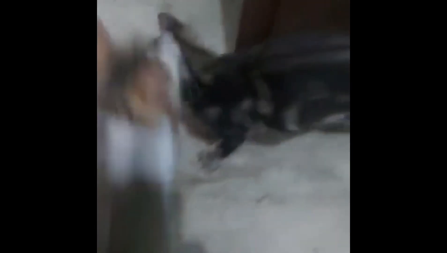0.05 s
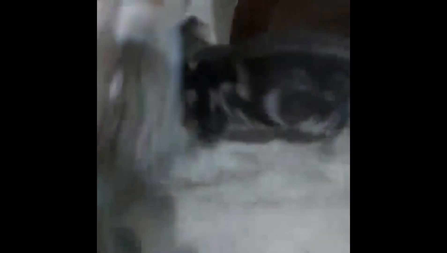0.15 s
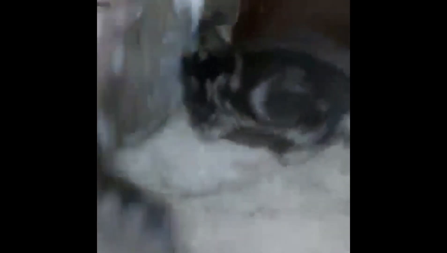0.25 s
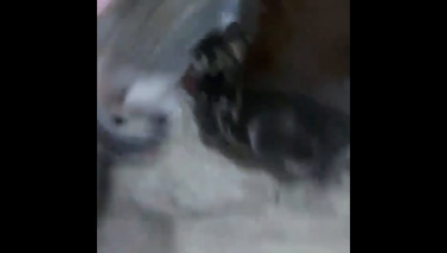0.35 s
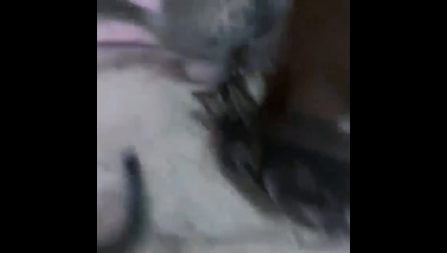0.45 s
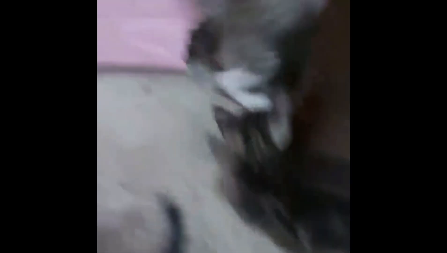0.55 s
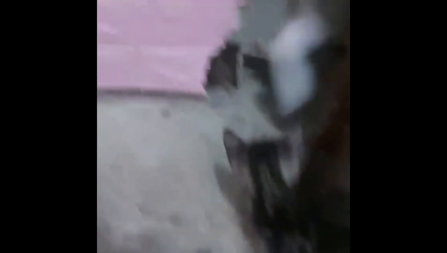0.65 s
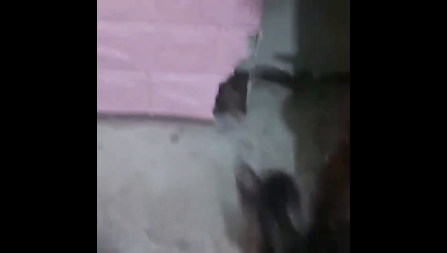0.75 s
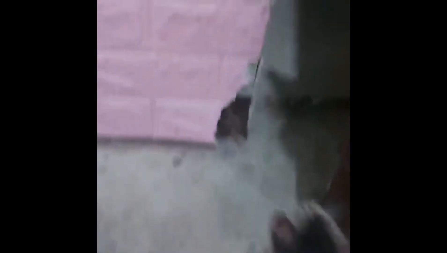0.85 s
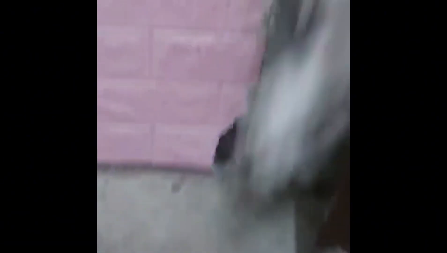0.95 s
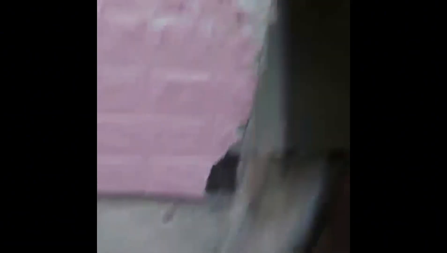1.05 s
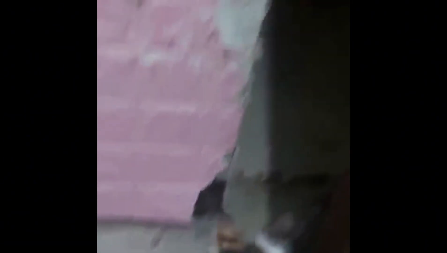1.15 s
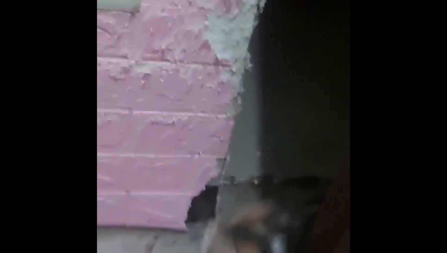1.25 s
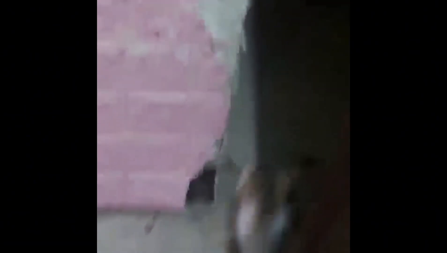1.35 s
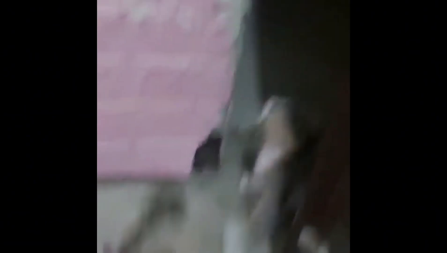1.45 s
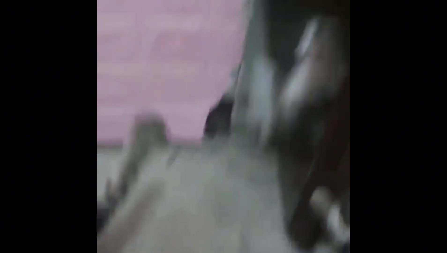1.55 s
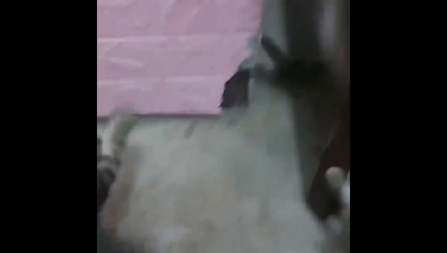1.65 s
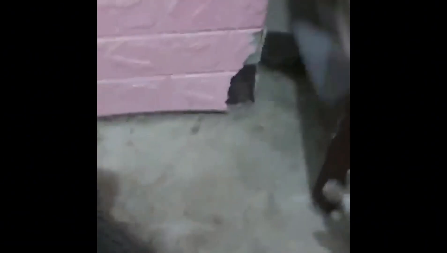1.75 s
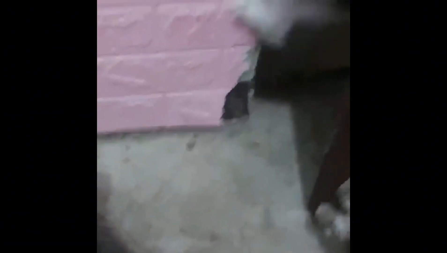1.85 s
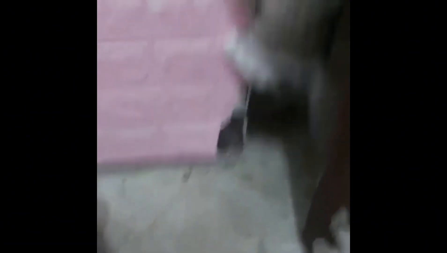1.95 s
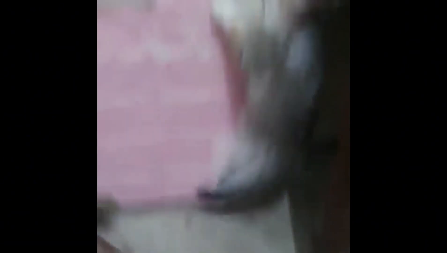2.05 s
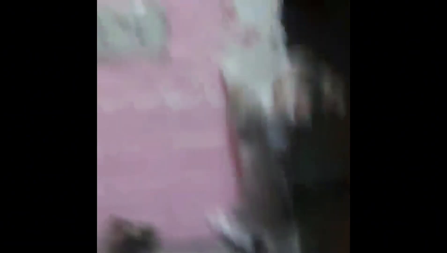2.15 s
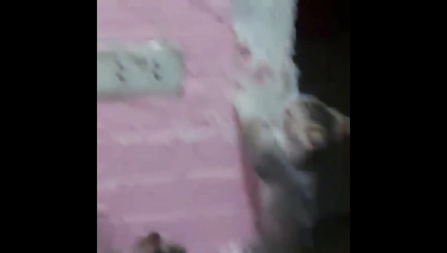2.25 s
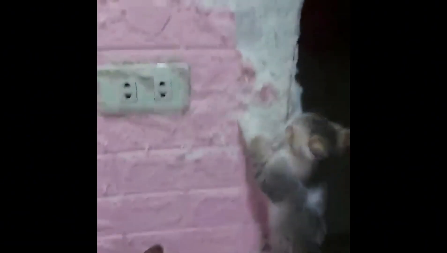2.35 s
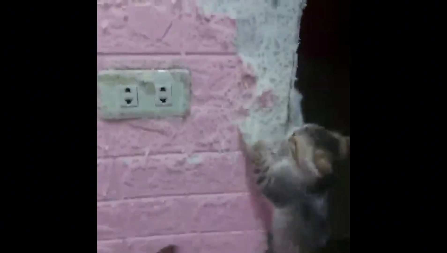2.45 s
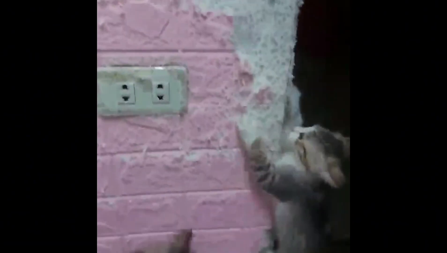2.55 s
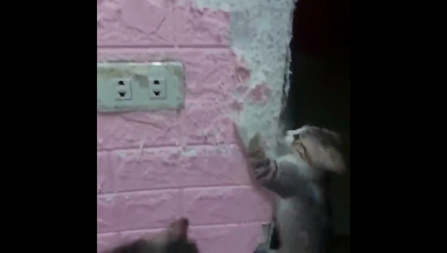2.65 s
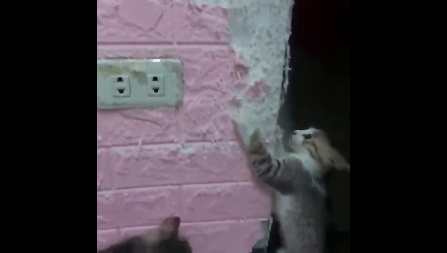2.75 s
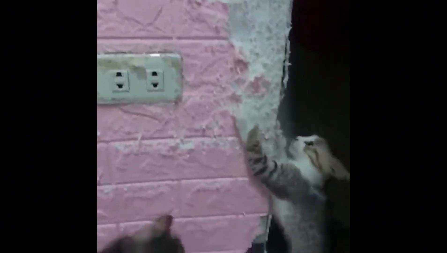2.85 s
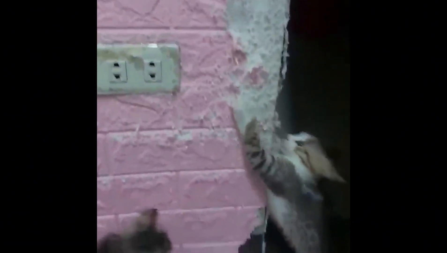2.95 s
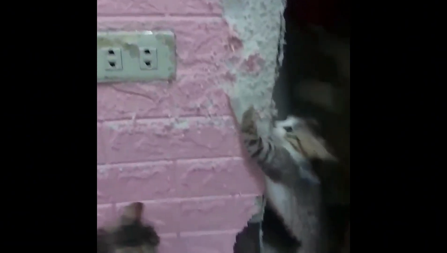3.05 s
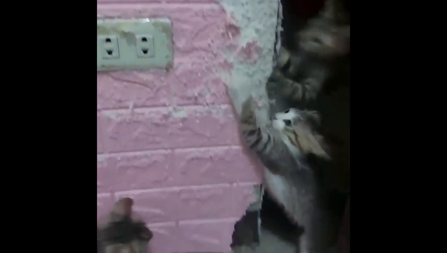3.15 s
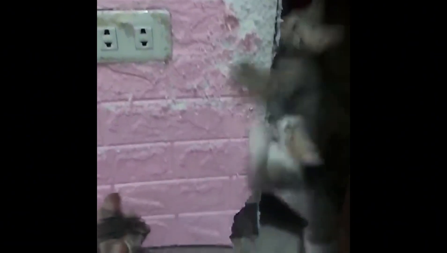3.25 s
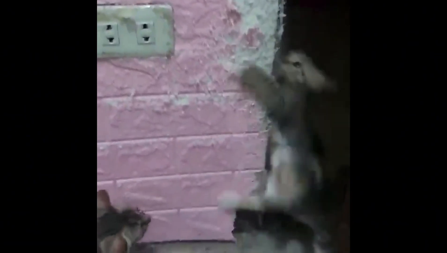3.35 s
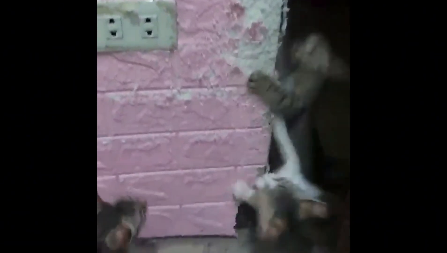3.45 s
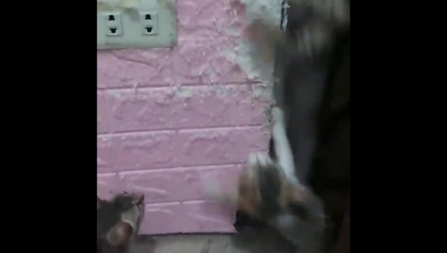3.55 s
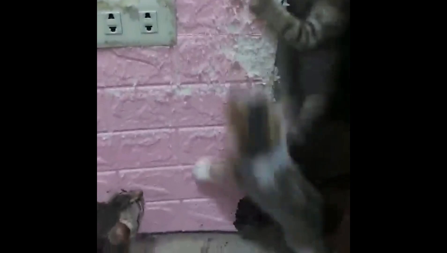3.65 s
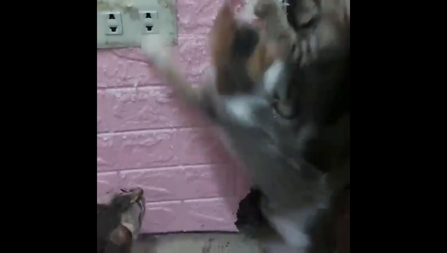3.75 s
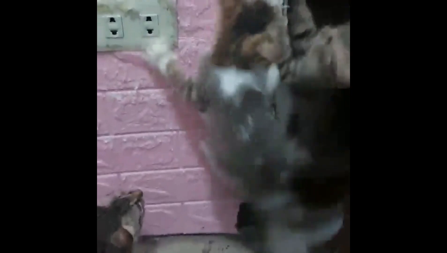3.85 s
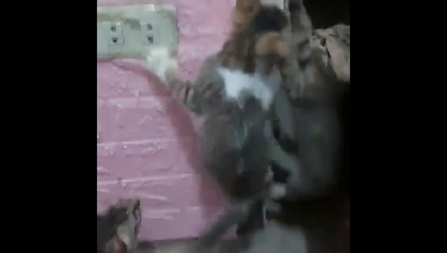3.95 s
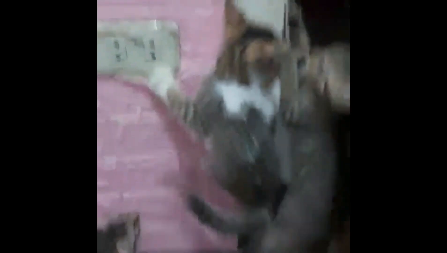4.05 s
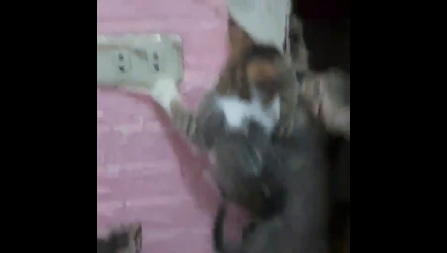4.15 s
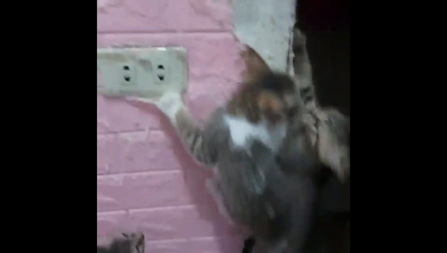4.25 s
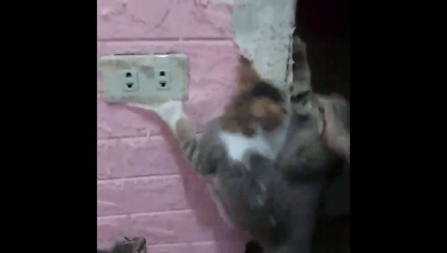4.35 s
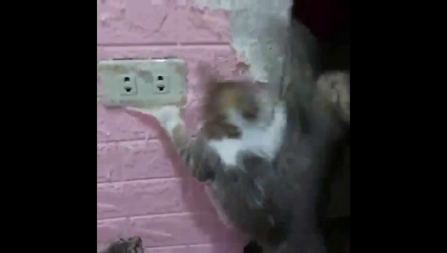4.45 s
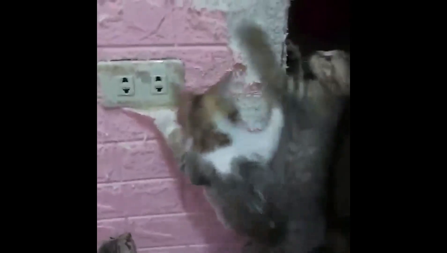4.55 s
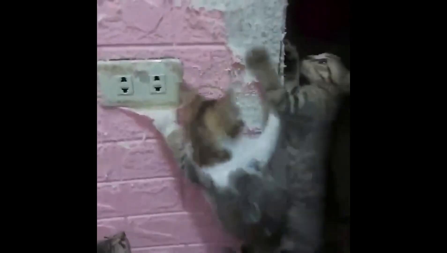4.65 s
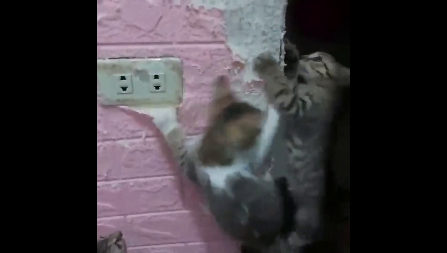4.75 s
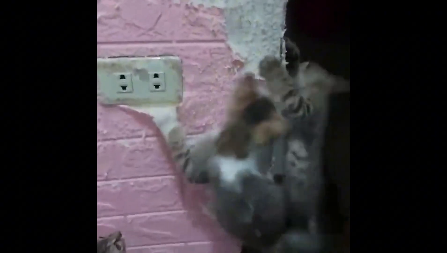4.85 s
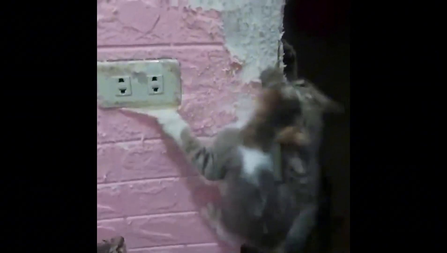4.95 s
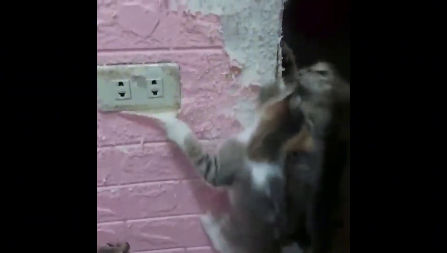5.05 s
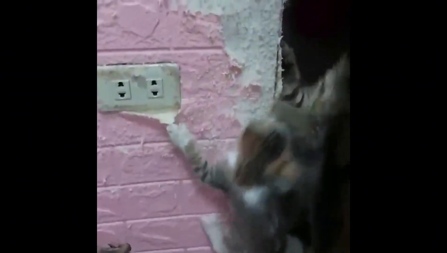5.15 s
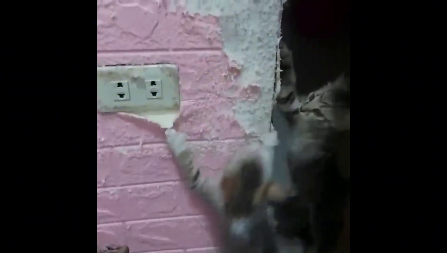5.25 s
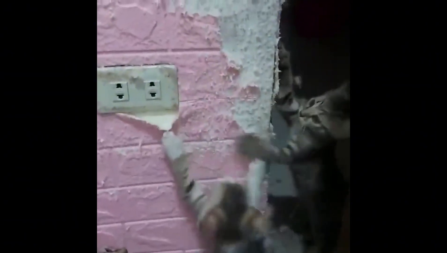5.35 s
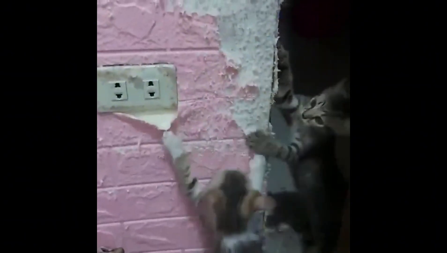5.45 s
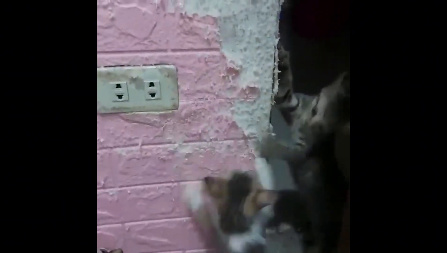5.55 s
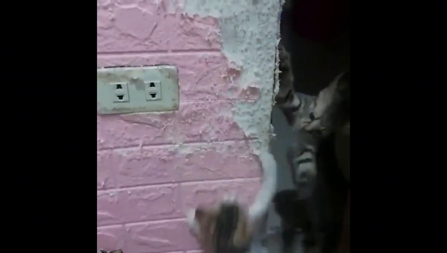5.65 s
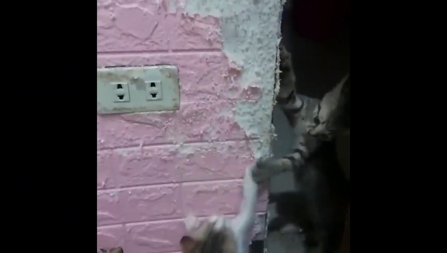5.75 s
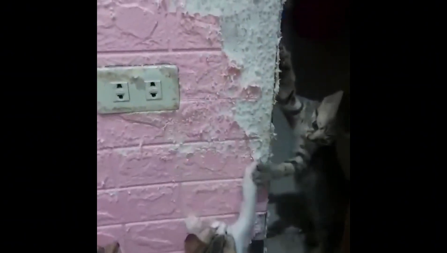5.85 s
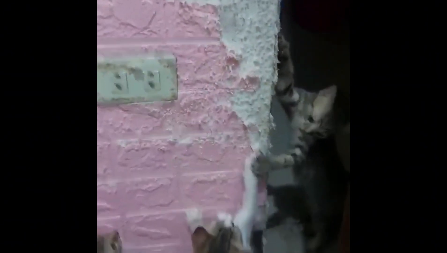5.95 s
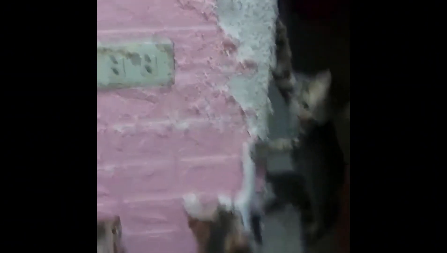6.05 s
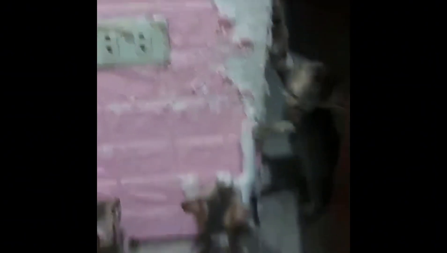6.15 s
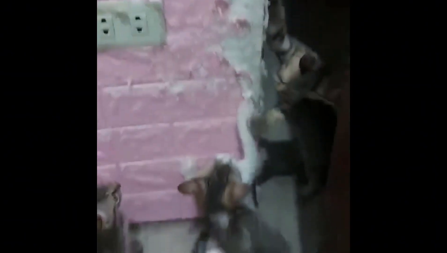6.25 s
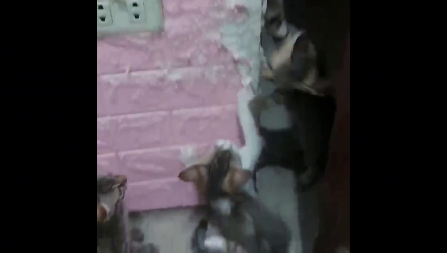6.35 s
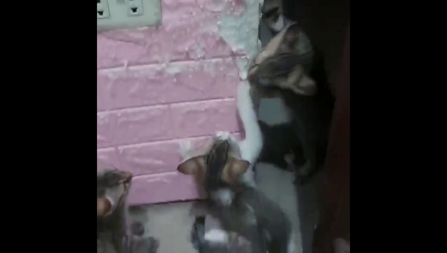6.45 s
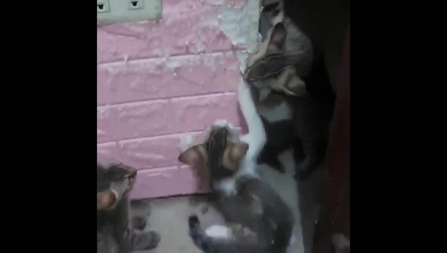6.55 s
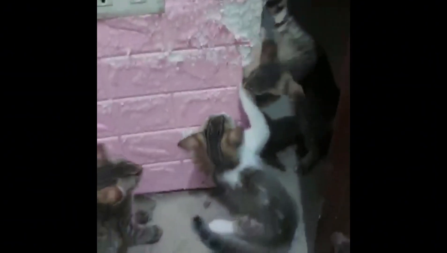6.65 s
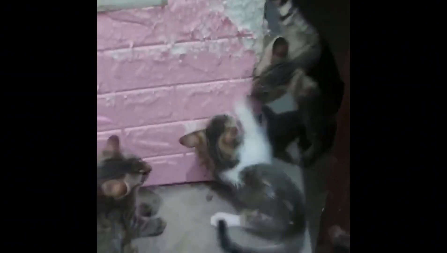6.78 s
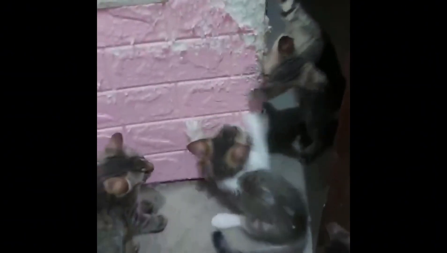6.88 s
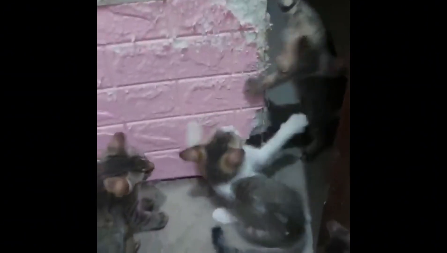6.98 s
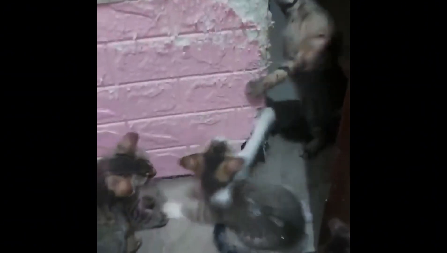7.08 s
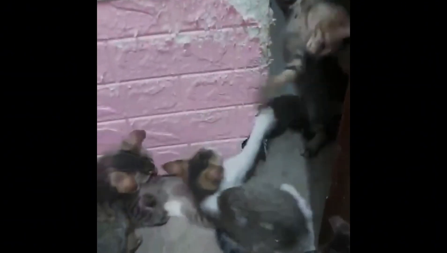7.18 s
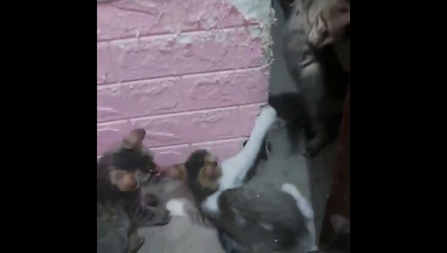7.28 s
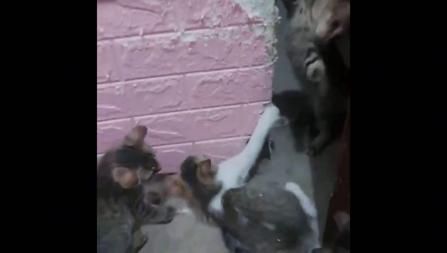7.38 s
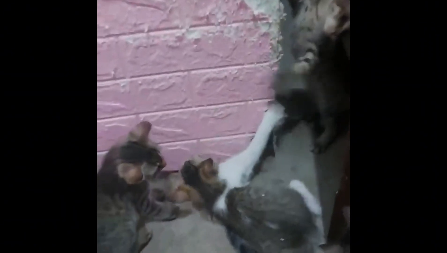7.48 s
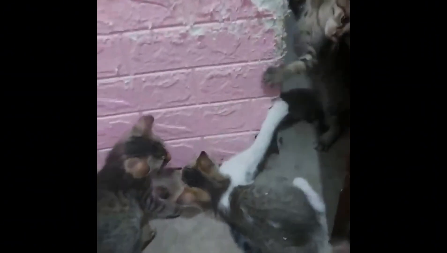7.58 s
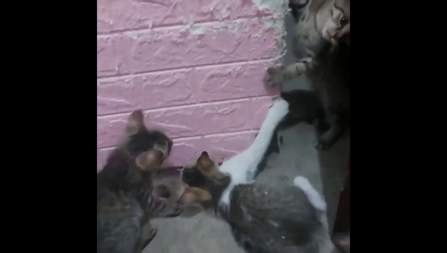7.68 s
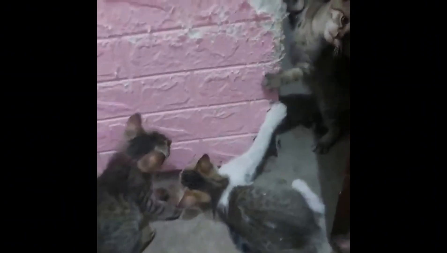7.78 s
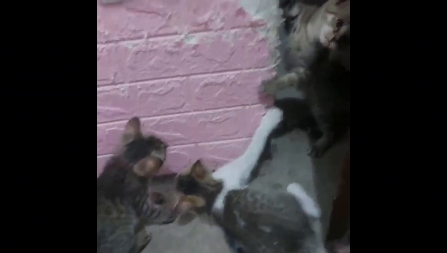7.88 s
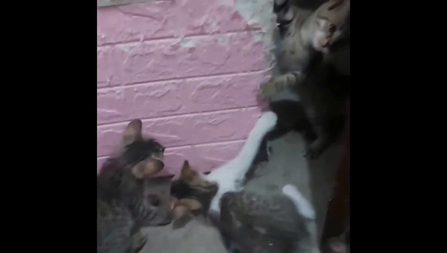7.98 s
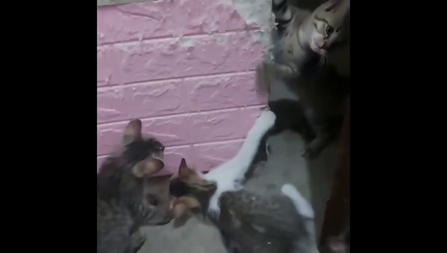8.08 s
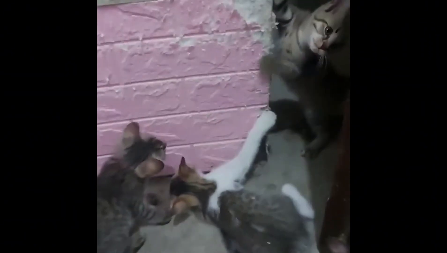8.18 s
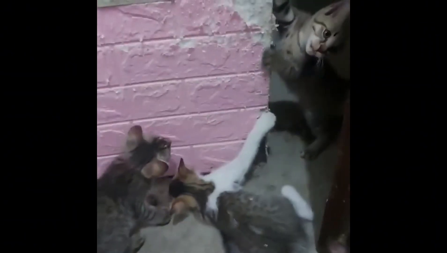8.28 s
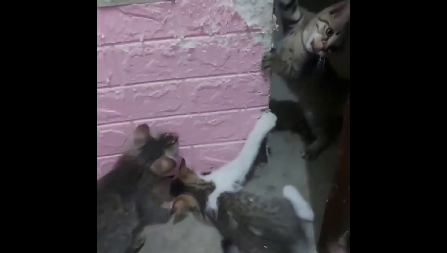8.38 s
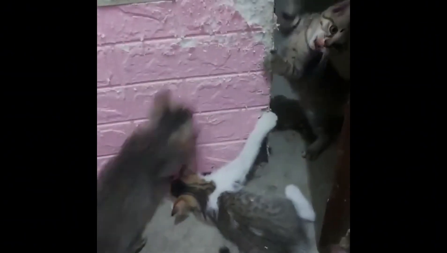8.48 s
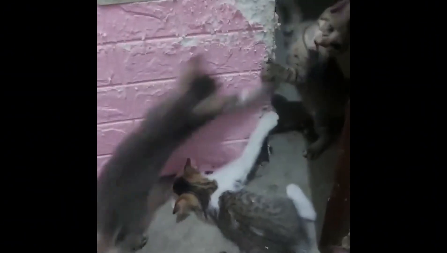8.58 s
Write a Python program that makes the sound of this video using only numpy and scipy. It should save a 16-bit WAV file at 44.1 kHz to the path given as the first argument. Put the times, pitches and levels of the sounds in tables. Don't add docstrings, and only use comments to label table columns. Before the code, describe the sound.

Close to a hand-held phone in a small bare concrete room, kittens scuffle: a burst of hissing fur and paws with dull bumps near one second, then a sharp tap around two. Claws pick and tear at a foam panel in dry snaps, busiest near four and five seconds, then sparse ticks. A faint pump hums and throbs throughout.

```python
import sys
import numpy as np
from scipy import signal
from scipy.fft import rfft, irfft, next_fast_len
from scipy.io import wavfile
from scipy.ndimage import uniform_filter1d, minimum_filter1d

SR = 44100
rng = np.random.default_rng(int(sys.argv[2]) if len(sys.argv) > 2 else 0)


def linear_from_db(decibels):
    return 10 ** (np.asarray(decibels, float) / 20)


def unload_wav(signal):
    wavfile.write(
        sys.argv[1],
        SR,
        np.round(np.clip(np.atleast_2d(signal).T, -1, 1) * 32767).astype(np.int16),
    )


N = 380141
T = np.arange(N) / SR
HZ = np.fft.rfftfreq(512, 1 / SR)
STROKE_HZ, STROKE_AT = 5.99, 7.01


def evened(x):
    return x / np.sqrt(np.mean(x ** 2) + 1e-20)


def read(points, hz):
    f, value = np.transpose(points)
    return np.interp(np.log(hz + 1), np.log(f + 1), value)


def curves(rows):
    s, *columns = np.transpose(rows)
    return [np.interp(T, s, c) for c in columns]


def sides(pan_db):
    return linear_from_db(np.array([pan_db / 2, -pan_db / 2]))


def filtered(x, order, hz, kind):
    return signal.sosfilt(signal.butter(order, hz, kind, fs=SR, output="sos"), x)


def drift(per_s, channels=1):
    size = next_fast_len(N)
    hz = np.fft.rfftfreq(size, 1 / SR)
    spectrum = rfft(rng.standard_normal((channels, size))) / (1 + (hz / per_s) ** 4)
    return evened(irfft(spectrum, size)[:, :N])


def luck(shape, size):
    rough = uniform_filter1d(rng.standard_normal(shape), size[0], axis=0)
    return evened(uniform_filter1d(rough, size[1], axis=1))


def ring(x, modes):
    out = np.zeros(x.shape)
    for k, (hz, width, db) in enumerate(modes):
        r = np.exp(-np.pi * width / SR)
        poles = [1, -2 * r * np.cos(2 * np.pi * hz / SR), r * r]
        out += (-1) ** k * linear_from_db(db) * signal.lfilter([1 - r, 0, r - 1], poles, x)
    return out


def hiss(colour_db, patchy_db, same, streaky_db):
    shape = (N // 128 + 5, 257)
    a, b, c, d = rng.standard_normal((4, *shape[::-1]))
    patches = luck(shape[::-1], size=(8, 14))
    streaks = luck(shape[::-1], size=(2, 24))
    same = np.clip(same, -1, 1)[:, None]
    left = a + 1j * b
    right = same * left + np.sqrt(1 - same ** 2) * (c + 1j * d)
    level = linear_from_db(colour_db[:, None] + patchy_db * patches + streaky_db * streaks)
    return signal.istft(np.array([left, right]) * level, nperseg=512, noverlap=384)[1][:, :N]


def swells(rows, extra_db=0):
    s, db, rise, fall = np.transpose(rows)[:4, :, None]
    late = T[::32] - s
    span_s = np.maximum(np.where(late < 0, rise, fall), .005)
    shape_db = db + extra_db - 30 * abs(late) / span_s
    return np.interp(T, T[::32], 10 * np.log10((linear_from_db(shape_db) ** 2).sum(0) + 1e-14))


# [peak t/s, peak level/dB, rise/s, fall/s]
SLIDES = [(.25, -84.5, 2.6, 1.6), (.64, -80, 0.036, 0.12), (.735, -61, 0.023, 0.13),
          (.775, -45, 0.074, 0.22), (.805, -39, 0.058, 0.24), (.835, -37, 0.14, 0.099),
          (.885, -45, .1, 0.24), (.93, -46.5, 0.21, 0.084), (.99, -44.5, 0.072, 0.11),
          (1.02, -43, 0.17, 0.082), (1.07, -55.5, .1, .2), (1.15, -58, 0.35, .15), (1.33, -76, 0.044, 0.39),
          (1.87, -69, 0.28, 0.044), (1.91, -62.5, 0.034, 0.18), (2.09, -50.5, 0.094, 0.065),
          (2.16, -49, 0.017, 0.11), (2.4, -67, 0.21, 0.16), (2.52, -75, 0.019, 1.8),
          (3.19, -65, 0.15, 0.081), (3.29, -60, 0.16, 0.13), (3.39, -64.5, 0.31, 0.077),
          (3.5, -61.5, 0.23, 0.23), (3.76, -63, 0.12, 1.3), (3.82, -49.5, 0.27, 0.42),
          (4.27, -68, 0.037, 0.21), (4.69, -71.5, 0.46, 0.91), (5.1, -64, 0.35, 0.83),
          (5.28, -55.5, 0.14, 0.27), (5.69, -63, 0.48, 0.34), (6.87, -71, 0.18, 0.43),
          (7.01, -77, 0.81, 0.68), (7.6, -68.5, 0.057, 0.28), (8.62, -72, 0.36, 0.24)]
# [f/Hz, density/dB per Hz]
FUR = [(290, -51.5), (500, -5.5), (1290, -4), (1910, -3.5), (2350, -2), (4920, 1.5), (5420, 2), (7070, -4),
       (12200, -1.5), (13400, -15.5), (14000, -85)]
# [t/s, left-right level/dB]
FACING = [(0, 6.5), (.75, 5), (.9, -0.5), (1.9, 3), (3.3, 2), (3.8, 2), (4.6, -0.5), (8.62, 3)]
# [t/s, brightness/dB]
GRAIN = [(0, 0.1), (.72, 2), (.78, -1.5), (.85, 0.5), (.93, 2), (.97, -1), (1.02, 3.5), (1.1, -4.5),
         (1.7, -0.7), (2.08, 3), (3.6, -5), (3.9, -1.3), (5.3, -5), (5.35, 2.5), (5.45, -1.2), (8.62, -0.7)]


def slides():
    stir_db = -91
    light_db_per_db, firm_db = 0.1149, -49
    level_db = 10 * np.log10(linear_from_db(swells(SLIDES)) ** 2 + linear_from_db(stir_db) ** 2)
    bright_db = light_db_per_db * (firm_db - level_db) + curves(GRAIN)[0]
    pan_db = curves(FACING)[0]
    dull = hiss(read(FUR, HZ) - 60 * (HZ > 6500), 3.2, 0 * HZ + .08, 2.5)
    bright = hiss(read(FUR, HZ) - 60 * (HZ <= 6500), 1.4, 0 * HZ + 0.042, 3.1)
    grit = linear_from_db(1.8 * drift(60) + 2. * drift(500, channels=2))
    fur = (dull + linear_from_db(bright_db) * bright) / np.sqrt(np.mean((dull + bright) ** 2))
    return linear_from_db(level_db + 6.5) * sides(pan_db) * grit * fur


# [peak t/s, peak level/dB, rise/s, fall/s, body level/dB]
BUMPS = [(0.048, -58, 4.4, 3.6, -8), (.8, -45.5, 0.55, 0.28, 4.5), (.84, -32.5, 0.051, 0.39, 2.5),
         (0.933, -20, 0.076, 0.27, -10.5), (1.0, -27, 0.11, 0.099, -17), (1.15, -50, 0.22, 0.29, 8),
         (1.6, -56.5, 2.8, 3, -7), (1.733, -42.5, 0.016, 0.33, 1.5), (1.986, -25.5, 0.0042, 0.23, 7),
         (2.05, -27.5, 0.052, 0.14, -2), (2.2, -66, .3, 0.55, -1), (2.64, -56, 0.69, 1.4, 3.5),
         (3.358, -56, 0.65, 0.38, 5), (3.83, -48, 0.9, 0.12, -7), (3.924, -49.5, 0.17, 0.39, -4),
         (4.172, -39.5, 0.02, 0.29, -8.5), (5.55, -57, 0.022, 0.31, -1), (4.21, -42, 0.12, 0.26, -24),
         (4.32, -48.5, 0.25, 0.22, -1), (5.248, -62.5, 0.089, 0.68, -9), (7.21, -66.5, 0.6, 0.22, 6),
         (7.73, -62, 1.43, 2, 4.5), (8.48, -65.5, 0.43, 0.12, -6), (8.594, -65.5, 0.38, 0.087, 9)]
# [f/Hz, width/Hz, level/dB]
THUD = [(75.7, 15, 3.5), (120, 25, 0.5), (143.8, 12.7, 5), (189.9, 8.6, -6.5), (245, 25, -5.5)]
# [f/Hz, width/Hz, level/dB]
BODY = [(300, 87, 8.5), (456, 71, 5.5), (550, 344, -3), (814, 560, -7)]


def bumps():
    level_db = swells(BUMPS)
    body_db = swells(BUMPS, np.array(BUMPS)[:, 4:]) - level_db
    push, other = rng.standard_normal((2, N)) * linear_from_db(2.5 * drift(20))
    thud = evened(ring(np.array([push, .75 * push + 0.79 * other]), THUD))
    thud /= np.sqrt(uniform_filter1d(thud[0] ** 2, size=2600) + 0.069)
    body = evened(ring(np.array([other, 0.53 * other + 0.58 * push[::-1]]), BODY))
    shade = linear_from_db(np.array([[0], [-23]]))
    return linear_from_db(level_db - 1.0) * (shade * thud + linear_from_db(body_db - 9) * sides(2.5)[:, None] * body)


# [multiple of the stroke rate, level/dB]
ORDERS = [(15, -89), (20, -80), (35, -87), (40, -81), (55, -71.5), (60, -67), (65, -78), (80, -80),
          (100, -95.5), (180, -96.5)]
# [multiple of the stroke rate, level/dB, lag/s]
CASE = [(24, -90.5, .02), (49, -72.5, 0.031), (54, -77.5, 0.072), (65.75, -73.5, 0.006),
        (82.06, -75.5, 0.024), (88.5, -81, 0.025), (100.3, -83, 0.017), (120.4, -88.5, 0.046)]
# [t/s, level/dB]
WHINE = [(0, -75), (1.6, -78), (3.1, -85), (4, -100), (8.62, -110)]


def motor():
    turns = STROKE_HZ * (T - STROKE_AT)
    whine = np.sin(2 * np.pi * 845 * T + 1.2 * drift(4.6)[0])
    case = np.sqrt(2) * linear_from_db(curves(WHINE)[0]) * whine
    for k, db, lag in [*CASE, *((k, db, None) for k, db in ORDERS)]:
        swell = 1
        if lag is not None:
            swell = evened(np.exp(2.2 * np.cos(2 * np.pi * (turns - STROKE_HZ * lag))))
        waver = linear_from_db(db + 2.2 * drift(.9)[0])
        phase = 2 * np.pi * (round(k) * turns + rng.random()) + 0.079 * drift(1.9)[0]
        case += np.sqrt(2) * waver * swell * np.sin(phase)
    return sides(0.89)[:, None] * np.array([np.roll(case, 9), case])


# [f/Hz, density/dB per Hz]
AIR = [(18, -63.5), (30, -17.5), (112, -18.5), (257, -39), (316, -3), (490, -16.5), (557, -19.5),
       (686, -17), (888, -23), (2030, -31), (2920, -29), (3320, -50), (6020, -67.5), (12700, -30.5),
       (14500, -75.5)]
# [f/Hz, correlation]
SAME = [(60, 0.67), (180, 0.97), (550, -0.51), (1650, -0.11), (4970, -0.07), (15000, -0.76)]


def air():
    x = hiss(read(AIR, HZ), 3.1, read(SAME, HZ), 1.7)
    high = filtered(x.mean(0), 4, 600, "high")
    x *= linear_from_db(-74.5) * sides(1.6)[:, None] / np.sqrt(np.mean(high ** 2))
    puff = filtered(x, 2, (450, 3300), "band")
    return x + 0.18 * np.cos(2 * np.pi * STROKE_HZ * (T - STROKE_AT - .025)) * puff


# [f/Hz, t60/s]
ROOM = [(300, 0.47), (1500, 0.3), (5000, 0.26), (12000, 0.16)]


def room(x):
    taps = np.zeros((2, SR // 2))
    at = np.arange(60, SR // 2 - 20, 20)
    at = at + rng.integers(0, 20, (2, len(at)))
    np.put_along_axis(taps, at, rng.choice([-1., 1.], at.shape), 1)
    hz, t, z = signal.stft(taps, SR, nperseg=128)
    swell = 1 - 0.76 * np.exp(-(t / 0.012) ** 2)
    decay = linear_from_db(-60 * t / read(ROOM, hz)[:, None])
    tail = signal.istft(z * swell * decay, SR, nperseg=128)[1]
    return signal.oaconvolve(x, tail / np.linalg.norm(tail[0]), axes=1)[:, :N]


# [f/Hz, width/Hz, level/dB]
PANEL = [(314, 120, -2), (498, 56.6, 4.5), (813, 210, -2), (1546, 492, 0)]
# [f share, width share, level/dB]
TIP = [(.58, .4, -7), (1., .35, 0), (1.5, .6, -3)]
# [f/Hz, width/Hz, level/dB]
FIZZ = [(6820, 1200, 6.5), (8470, 2500, 14.5), (11560, 2300, 12.5)]
# [t/s, peak level/dB, left-right/dB, room level/dB, tip f/Hz]
PICKS = [(1.7658, -50, 18.5, 3.5, 5910), (2.029, -29, 4.5, -6, 3960), (2.365, -51, -1, 19, 5300),
         (3.022, -50, 13, -1, 4524), (3.584, -33.5, 4, -10, 5210), (3.7069, -34.5, 21.5, 2, 5760),
         (3.7764, -15.5, 16, -3.5, 3750), (3.8405, -23, -0.5, -8, 3700), (3.9472, -36, -8, -15, 4270),
         (5.233, -17.5, -3, -15, 4760), (5.2938, -8, -0.5, -8, 4200), (5.833, -46.5, 10, -8, 5460)]
PULLS = [(3.761, -30.5, 8, 0, 2600), (3.857, -27, 21.5, -2.5, 4760), (3.931, -32, 20.5, -6.5, 4230),
         (4.978, -14, 0, -7, 2530), (5.1163, -19, -1.5, -9, 2380), (5.3426, -29.5, 0, -12, 1920),
         (5.549, -20, -1.5, -7, 1900), (6.8014, -30, 1, -3, 1740), (7.135, -41.5, 1, -0.5, 3135),
         (8.4979, -47, 7.5, -5, 2500)]
RIPS = [(1.8017, -39, 3, -7.5, 4060), (1.9203, -28.5, 10.5, -9, 4330), (2.0694, -32.5, 2.5, 1, 4550),
        (2.533, -42.5, 3, -6, 4630), (2.9822, -66.5, 7, 12.5, 2510), (3.2448, -31.5, 15.5, -8, 4150),
        (3.6597, -42, 2, 7, 4370), (5.339, -44.5, -2.5, 6, 5000), (4.128, -54, 4, -1.5, 4500),
        (4.3915, -52.5, 5, -21, 2460), (4.536, -42, 0.5, 3, 5100), (4.637, -53.5, 1.5, 9.5, 5880),
        (4.878, -54, -3, -8, 4830), (4.9292, -37.5, -1, 0.5, 4260), (7.5905, -42, 1.5, 1.5, 3960),
        (8.4495, -57.5, 5, -1, 2260)]
DIGS = [(0.604, -38, 3.5, 4.5, 4190), (1.7484, -53, 0, 14, 4030), (1.906, -42, 14, -5, 4660),
        (2.157, -36.5, -3, 8.5, 4200), (2.163, -30.5, 3, 3.5, 4290), (2.6328, -44, 10, 3, 5500),
        (2.6467, -39, 12, 4, 4980), (3.3366, -34.5, 5.5, -1.5, 4250), (3.4378, -39, 10.5, 6.5, 4480),
        (3.671, -38.5, 7.5, 2.5, 3900), (3.7555, -39.5, 10, -2.5, 5500), (3.732, -43, 8.5, -2, 5900),
        (3.7372, -34, 14, -1.5, 4440), (4.148, -41.5, 3.5, -40, 2180), (4.2816, -48.5, 18.5, 5, 2080),
        (5.2196, -27.5, -2, -5, 1980), (5.2735, -27, -2, -3, 4760), (6.0052, -47.5, 2.5, 3.5, 3400)]
TAPS = [(2.1765, -7.5, -2.5, -12.5, 3900), (5.2375, -28, 0.5, -7, 4000), (2.847, -37, 5, -4.5, 4040),
        (4.726, -26.5, 0.5, -5, 4850), (7.0, -36, 2, -3.5, 4320)]
PINGS = [(7.0424, -20.5, -5, -8.5, 4530), (7.0554, -35, 7, -7, 4100), (2.2, -40.5, -1, -6, 5070),
         (3.793, -27.5, 7.5, -7, 3900), (5.311, -34, -2.5, -5.5, 4600), (5.5615, -33, -3, -6, 5600),
         (4.533, -41, 0.5, -3, 6200), (2.8, -45.5, 6, -7.5, 4500), (4.646, -48, 5, 2, 6000)]
TICKS = [(1.951, -50, 10, -8, 6000), (2.087, -40, 3, -6, 7000), (2.655, -46, 12, -6, 6500),
         (2.668, -44, 12, -4, 6500), (2.738, -53, 8, -6, 7700), (3.431, -46, 9, -3, 5500),
         (6.8017, -39, 1, -6, 7000), (5.199, -40, 0.5, -10, 7500), (4.9795, -19.5, 0.5, -7, 4300),
         (3.86, -29, 8, -4, 5800), (6.8019, -35, 1, 0.5, 4300), (3.7768, -22, 9, -5, 8000),
         (5.1175, -29, 0.5, -8, 4200), (4.9296, -40, -1, 0.5, 4300), (5.551, -30, -1, -9, 4000)]
THUMPS = [(0.7186, -68.5, 24, 22.5, 5070), (1.9815, -39.5, 15, -8, 2000), (5.2, -31.5, 0, -11.5, 2260)]
# [snaps, panel knock/dB, fizz/dB, side rings of the tip/dB, loose tears/dB]
HOLDS = [
    (PICKS, -25.5, -20.5, 0, -4.5),
    (TAPS, -31, -35, -1.8, -8),
    (PULLS, -8.5, -24, 0, -5),
    (RIPS, -19.5, -7, 0, -3.5),
    (DIGS, -14.5, -9, 0, -3.5),
    (THUMPS, 1.5, -18.5, 0, -6.5),
    (PINGS, -35.5, -33.5, -14, -7),
    (TICKS, -34, -21, -1, -7),
]


def tearing(t, hz, side_db, loose_db):
    late = t - .0015
    envelope = linear_from_db(loose_db - 60 * abs(late) / np.where(late < 0, .005, .018))
    tears = rng.standard_normal((2, len(t))) * (rng.random(len(t)) < .08) * envelope
    tears[1] = 0.056 * tears[0] + 0.73 * tears[1]
    tears[:, 66] = 1.1
    if side_db < -8:
        tears = ring(tears, [(hz, .7 * hz, 0)])
    return tears


def claws():
    echo_s, echo_db = .0036, -12.5
    t = np.arange(2600) / SR
    near = np.zeros((2, N + 2 * len(t)))
    far = np.zeros((3, 2, N + len(t)))
    snaps = [(*row, *kind) for rows, *kind in HOLDS for row in rows]
    for k, (s, db, pan_db, room_db, hz, knock_db, fizz_db, side_db, loose_db) in enumerate(snaps):
        tears = tearing(t, hz, side_db, loose_db)
        tip_modes = np.multiply(TIP, [hz, hz, 1]) + np.outer([1, 0, 1], [0, 0, side_db])
        parts = [ring(tears, modes) for modes in (tip_modes, FIZZ, PANEL)]
        tip, fizz, knock = (p / abs(p).max() for p in parts)
        snap = linear_from_db(db) * (tip + linear_from_db(fizz_db + 12.0) * fizz + linear_from_db(knock_db + 5.5) * knock)
        i = round(s * SR) - 62
        left, right = sides(pan_db)
        for j, gain in ((i, 1), (i + round(echo_s * SR), linear_from_db(echo_db))):
            near[0, j:j + len(t)] += gain * left * snap[0]
            near[1, j + 4:j + 4 + len(t)] += gain * right * snap[1]
        airborne = snap[0] - 0.19 * linear_from_db(db + knock_db - 6.0) * knock[0]
        far[k % len(far), :, i:i + len(t)] += linear_from_db(room_db - 0.5) * sides(.5 * pan_db)[:, None] * airborne
    echoes = sum(room(spot) for spot in far)
    return near[:, :N] + sides(1.9)[:, None] * echoes


# [t/s, peak level/dB, f/Hz, t60/s]
BOOMS = [(3.8568, -35, 518, 0.18), (4.9802, -31, 330, 0.11), (5.116, -37.5, 314, 0.14),
         (5.1996, -44.5, 378, .15), (5.5484, -40, 350, 0.07)]


def booms():
    out = np.zeros(N)
    for s, db, hz, t60 in BOOMS:
        t = np.maximum(T - s, 0)
        envelope = linear_from_db(db - 60 * t / t60) * (1 - np.exp(-t / 0.0012))
        out += envelope * (np.sin(2 * np.pi * hz * t) + 0.31 * np.sin(2 * np.pi * 1.3 * hz * t))
    return out


# [t/s, length/s, level/dB, f/Hz]
SQUEAKS = [
    (4.056, 0.09, -61.5, 1180),
    (4.105, 0.085, -63, 1560),
    (4.27, 0.049, -68, 1950),
]


def squeaks():
    out = np.zeros((2, N))
    for s, length, db, hz in SQUEAKS:
        arch = np.sin(np.pi * np.clip((T - s) / length, 0, 1))
        out += linear_from_db(db) * arch * evened(ring(rng.standard_normal(N), [(hz, 70., 0)]))
    return sides(5.7)[:, None] * out


def scene():
    return slides() + bumps() + motor() + air() + claws() + booms() + squeaks()


def starve(x):
    hz, t, z = signal.stft(x, SR, nperseg=256, noverlap=192)
    power = uniform_filter1d((abs(z) ** 2).mean(0), size=5, axis=0)
    level_db = 10 * np.log10(uniform_filter1d(power, size=4, axis=1) + 1e-18)
    peak_db = -minimum_filter1d(-level_db[15:70].max(0), size=19, origin=-2)
    reach_db = 23.5 + 8 * (hz[:, None] < 5000) + 8. * luck(level_db.shape, size=(7, 5))
    under = .5 + (level_db - peak_db + reach_db) / 1.5
    gain = np.clip(under + 9 * (hz[:, None] < 2000), .05, 1)
    x = signal.istft(z * gain, SR, nperseg=256, noverlap=192)[1]
    hz, t, z = signal.stft(x, SR, nperseg=1024, noverlap=768)
    margin = 1.25 + (np.log(hz[:, None] / 5500 + 1e-3) / 1.1) ** 2
    chance = luck(z.shape[1:], size=(8, 12)) + .6 * luck(z.shape[1:], size=(30, 25))
    keep = np.where(chance > -margin * 1.03, 1, .06)
    return signal.istft(z * keep, SR, nperseg=1024, noverlap=768)[1][:, :N]


def band_limit(x):
    return signal.sosfilt(signal.butter(12, 16640, fs=SR, output="sos"), x)


OPEN_TOP_S = [1.802, 1.92, 2.07, 2.647, 3.337, 3.707, 3.776, 4.148, 5.117, 6.801, 7.59]


def record(dry):
    x = filtered(dry, 2, 55, "high")
    low = signal.oaconvolve(x, signal.firwin(301, 13100, fs=SR)[None], "same")
    opened = sum(np.exp(-((T - s) / .003) ** 4) for s in OPEN_TOP_S)
    mix = starve(low + (linear_from_db(-28) + linear_from_db(-6.0) * opened) * (x - low))
    return band_limit(mix)


dry = scene()
out = record(dry)
unload_wav(out)
```